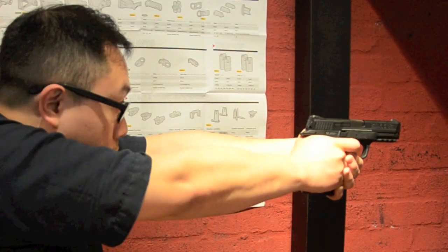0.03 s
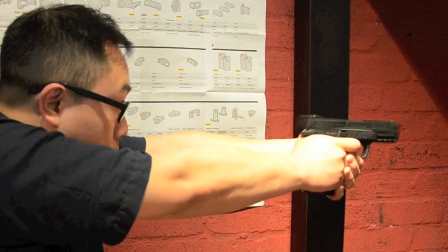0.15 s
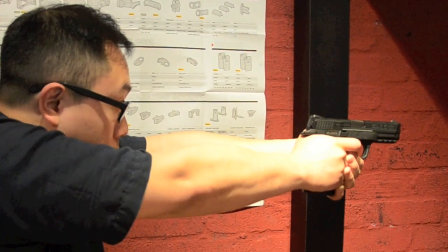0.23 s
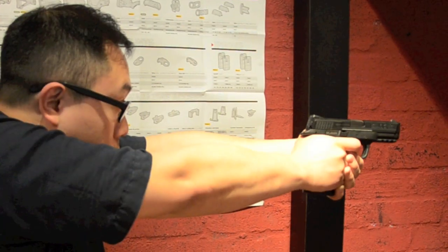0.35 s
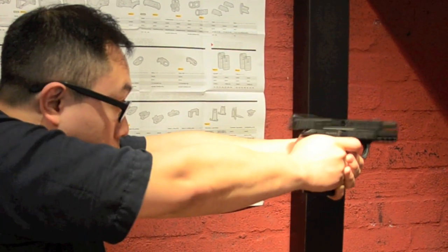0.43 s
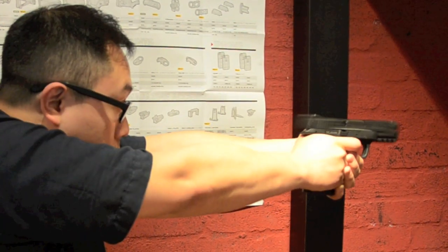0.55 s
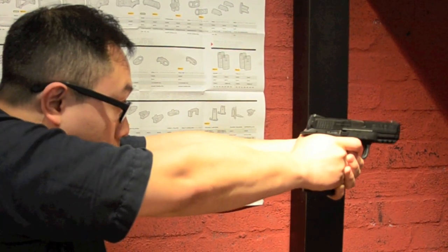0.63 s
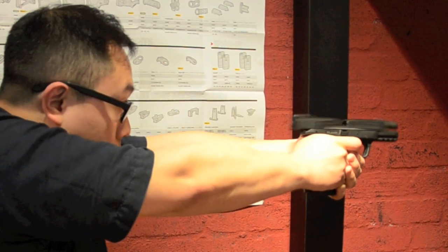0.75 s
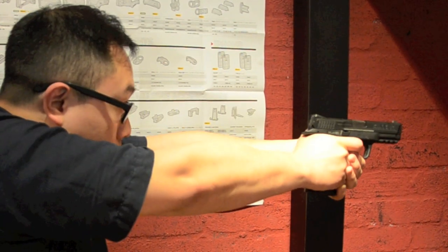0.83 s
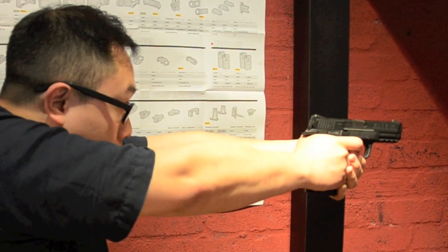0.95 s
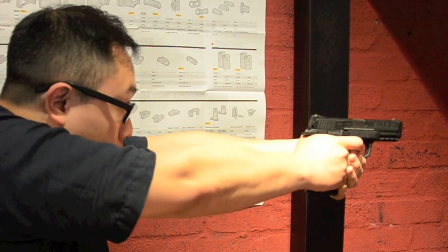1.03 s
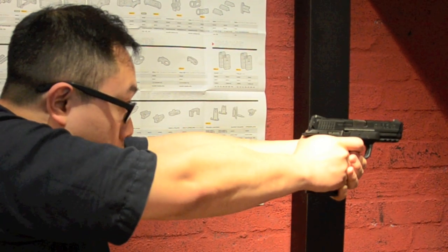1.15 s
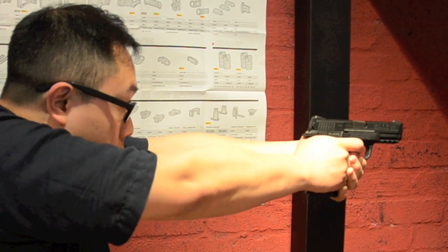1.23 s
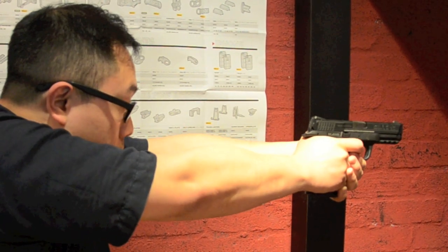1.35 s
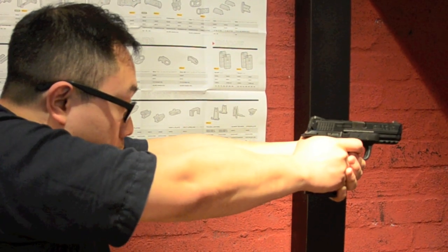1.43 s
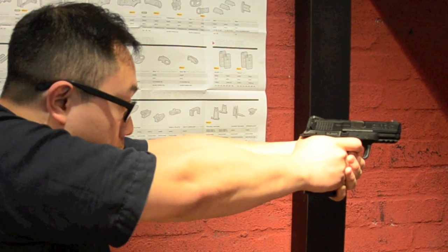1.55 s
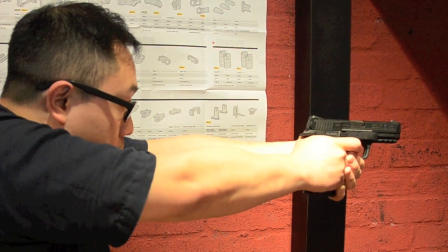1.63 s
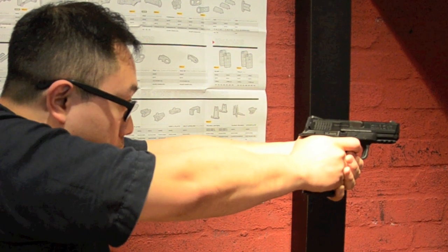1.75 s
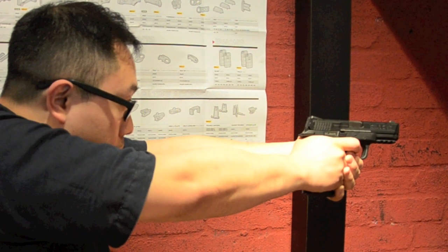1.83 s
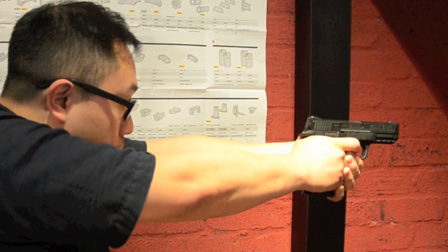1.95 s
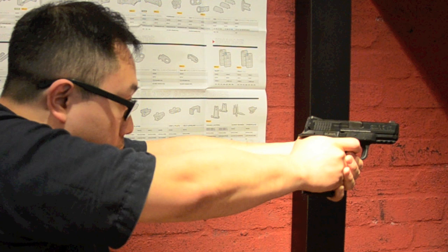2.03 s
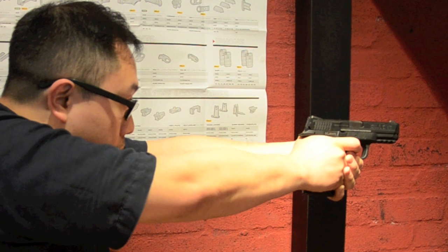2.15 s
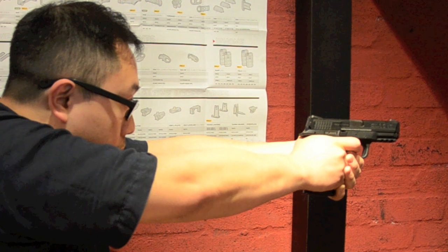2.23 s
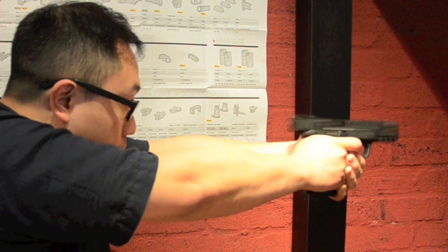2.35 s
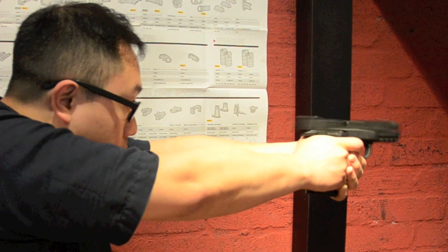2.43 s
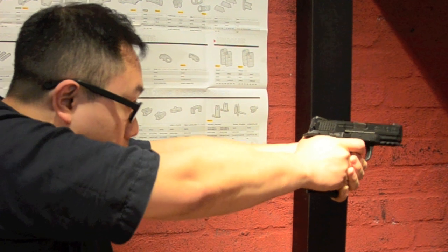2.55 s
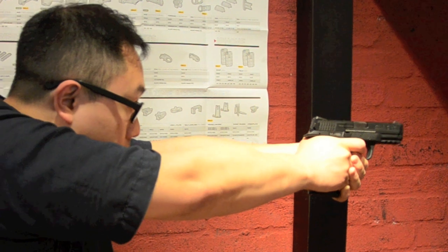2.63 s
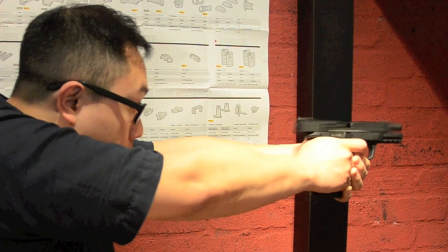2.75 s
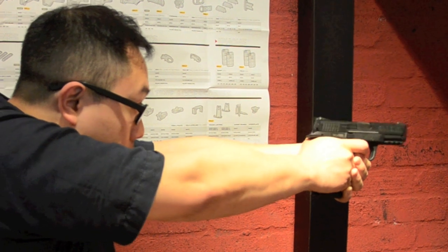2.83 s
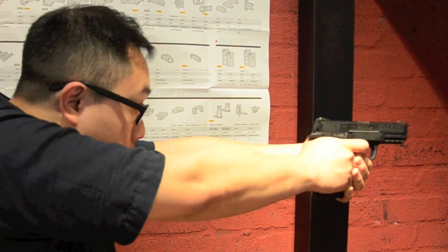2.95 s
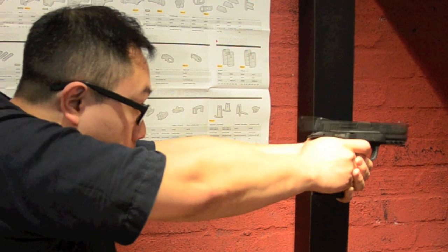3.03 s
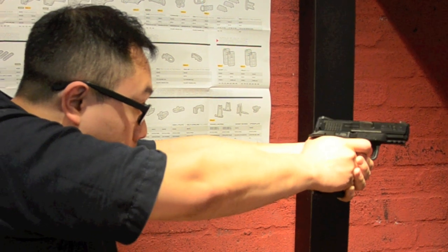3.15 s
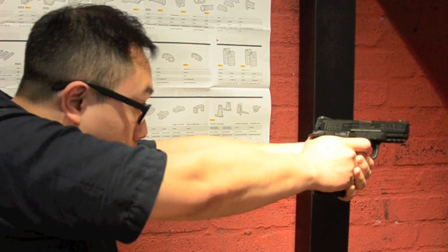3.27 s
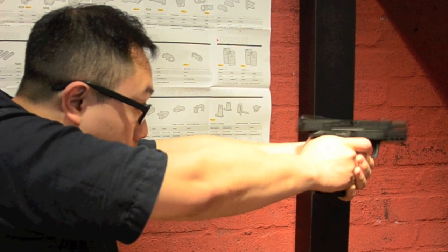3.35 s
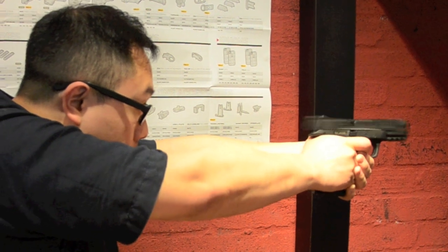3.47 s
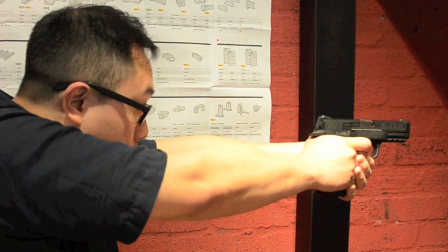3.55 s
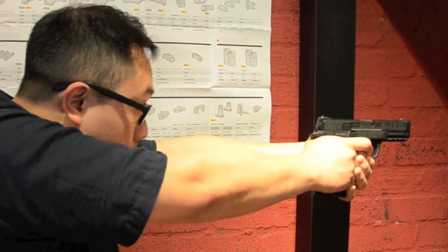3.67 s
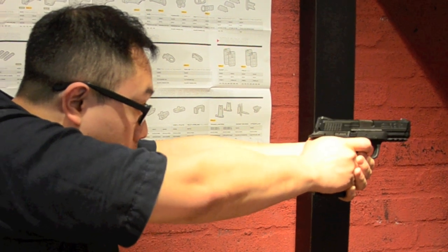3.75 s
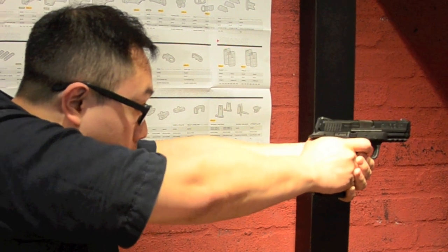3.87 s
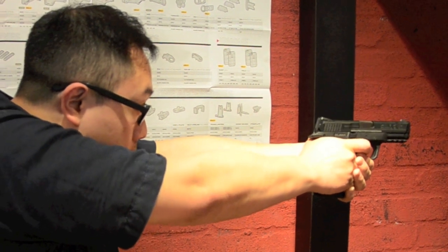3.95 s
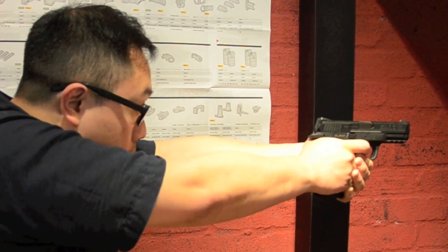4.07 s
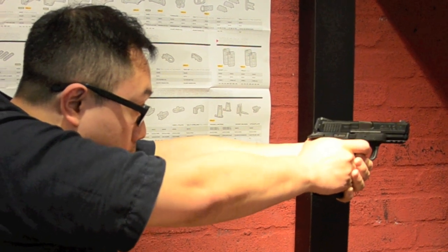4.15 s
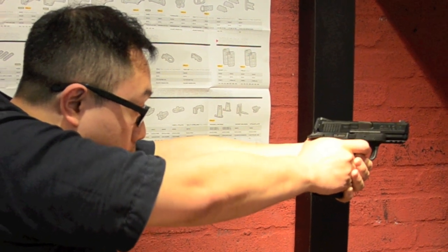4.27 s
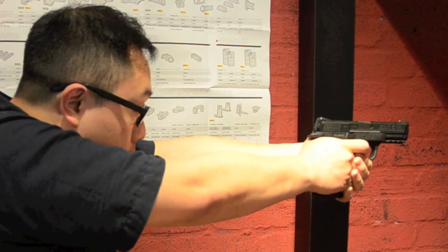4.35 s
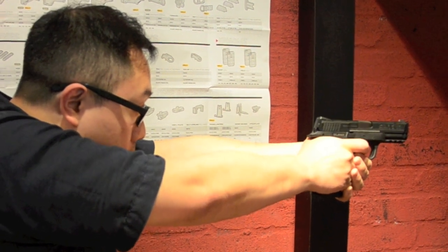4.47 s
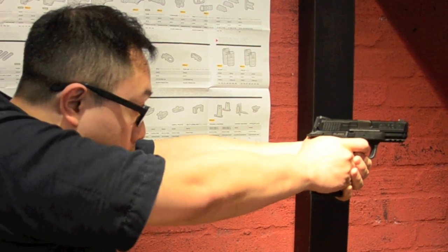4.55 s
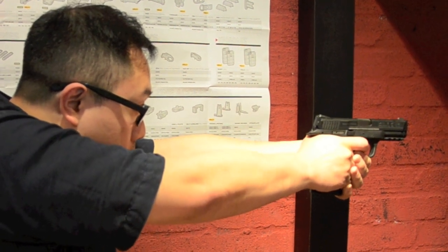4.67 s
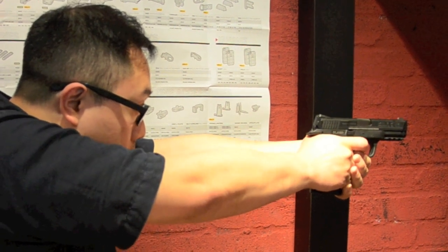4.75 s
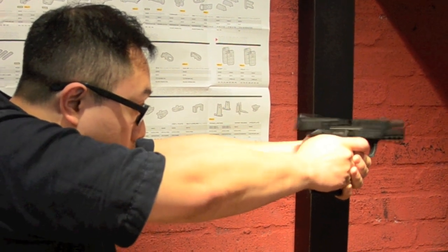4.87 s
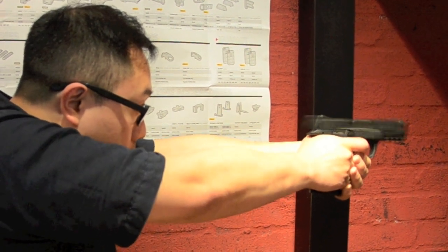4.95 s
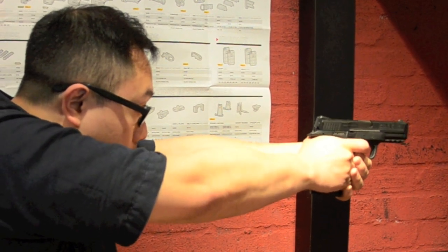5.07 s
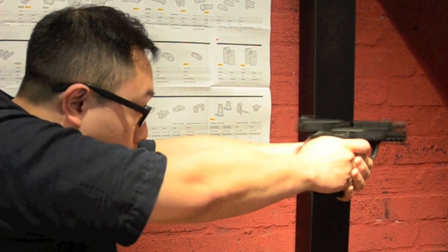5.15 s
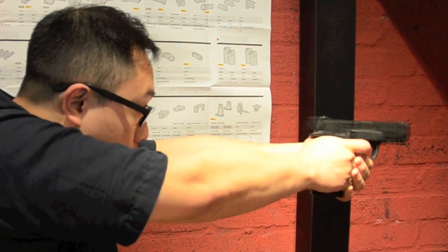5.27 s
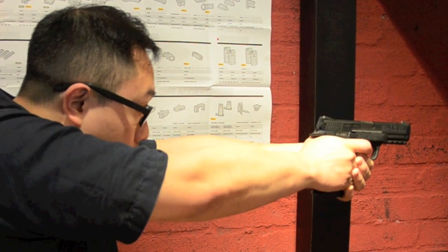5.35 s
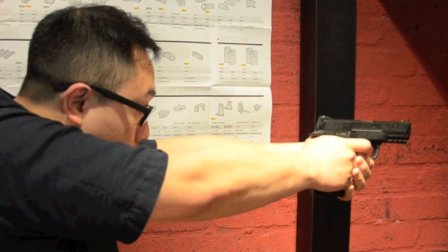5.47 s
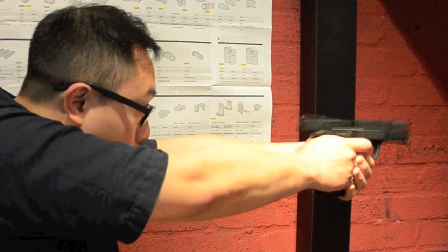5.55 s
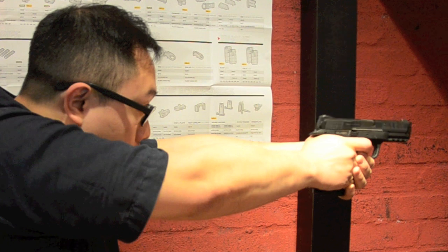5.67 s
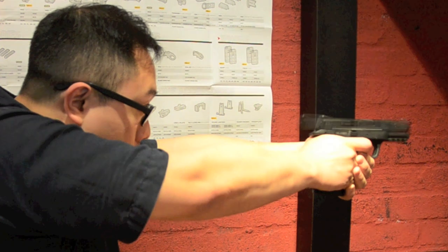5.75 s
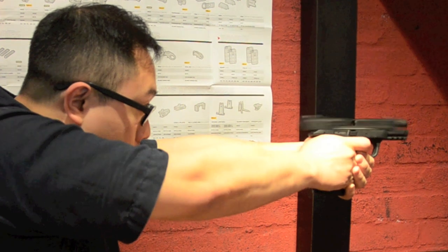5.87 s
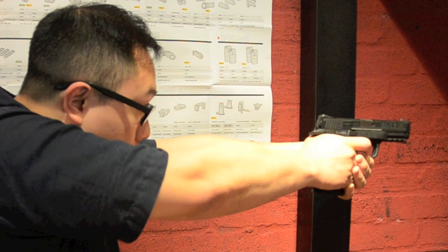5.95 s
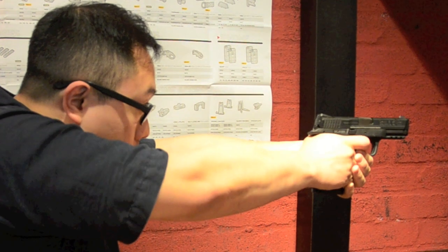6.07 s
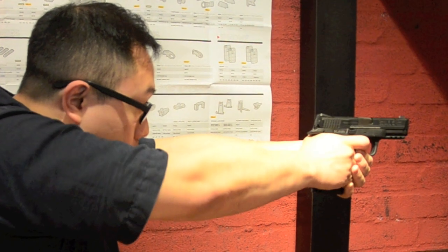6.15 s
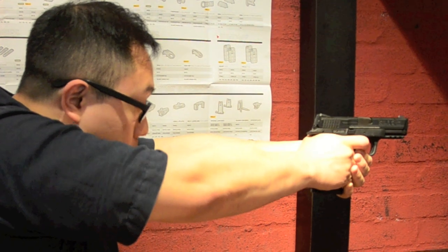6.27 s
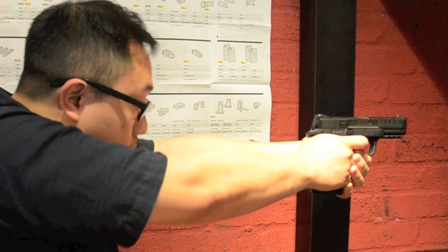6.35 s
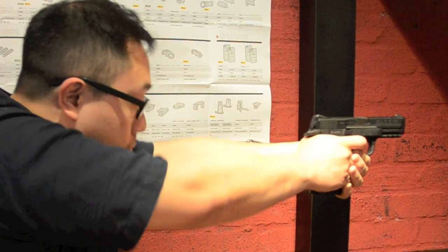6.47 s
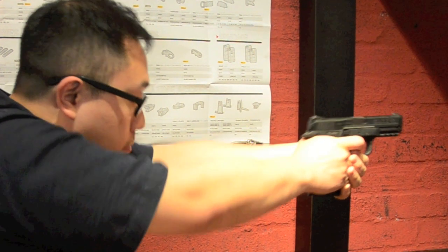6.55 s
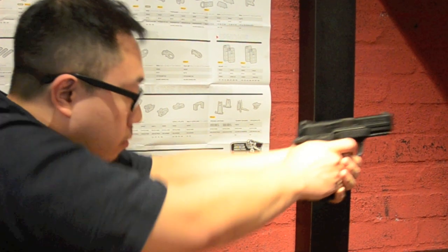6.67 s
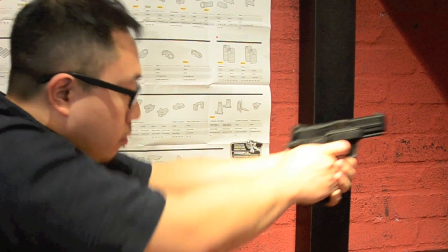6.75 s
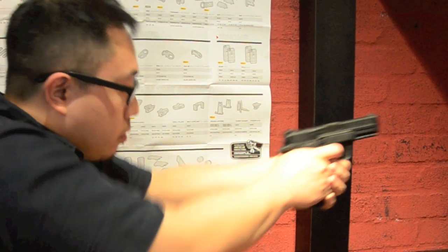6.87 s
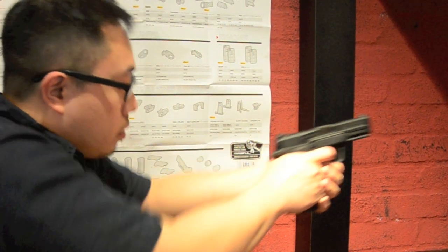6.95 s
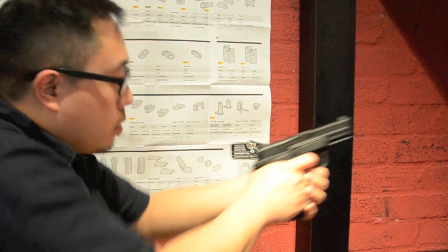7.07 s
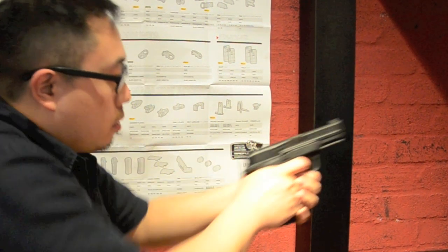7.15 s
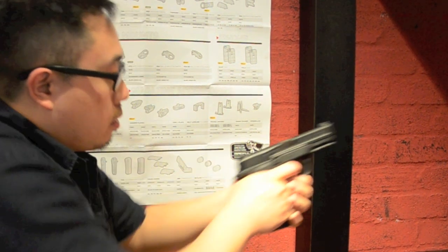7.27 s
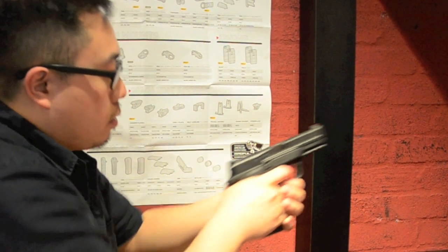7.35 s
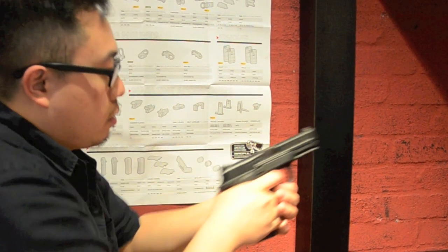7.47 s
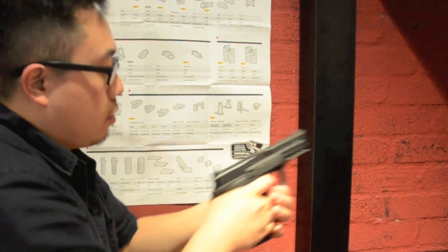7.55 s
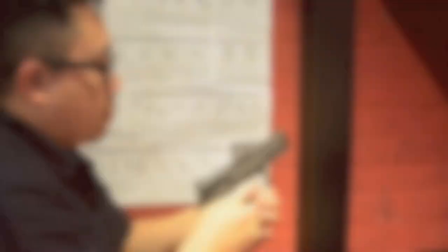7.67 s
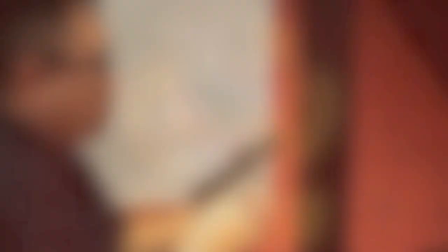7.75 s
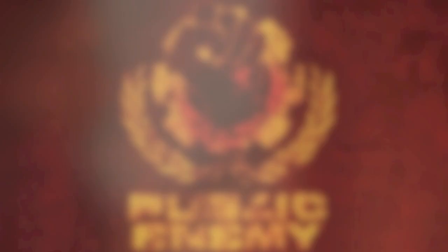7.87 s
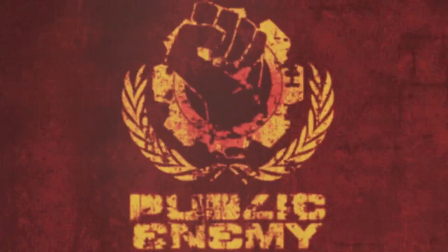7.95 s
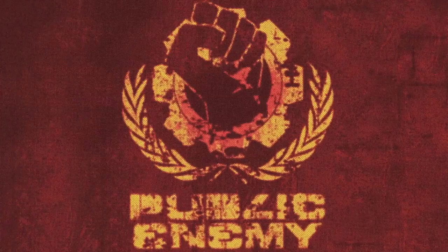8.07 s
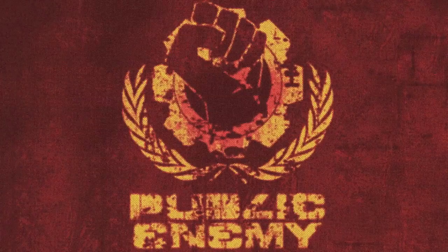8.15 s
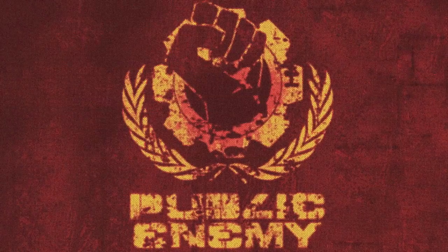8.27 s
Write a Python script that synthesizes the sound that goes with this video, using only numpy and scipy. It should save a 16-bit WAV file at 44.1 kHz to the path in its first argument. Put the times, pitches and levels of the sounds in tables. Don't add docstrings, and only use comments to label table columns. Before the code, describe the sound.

The echo of an earlier shot is already hanging in a hard brick hall as a gas pistol cracks close by at 0.1, 0.4 and 0.7 seconds. Each shot is a very short gas burst with a metallic slide clack, followed about 0.13 seconds later by a pellet smacking the backstop. Echoes last about a second. From 0.9 to 2.2 other lanes answer with blurred pops. Four more shots come between 2.3 and 3.35, then distant reports and smacks around 3.9 to 4.5. The last four shots, 4.8 to 5.8, are hardest; from 5.15 the slide rattles brightly and the magazine gives a low hollow knock. Two distant reports follow near 6.1 and 6.3, then much weaker ones from 6.8, with tiny handling clicks. Ventilation and thin hum lie beneath. The small microphone clips, ducks and recovers; sound fades from 7.6 to silence by 8.1.

```python
import sys
import numpy as np
from scipy import signal
from scipy.fft import rfft, irfft
from scipy.io import wavfile

SR = 44100
rng = np.random.default_rng(int(sys.argv[2]) if len(sys.argv) > 2 else 0)


def gain_from_decibels(decibels):
    exponent = np.asarray(decibels, float) / 20
    return 10 ** exponent


def dump(signal):
    limited = np.clip(np.atleast_2d(signal).T, -1, 1)
    pcm = np.round(limited * 32767).astype(np.int16)
    wavfile.write(sys.argv[1], SR, pcm)


N = 366372
TIME = np.arange(N) / SR
HZ = np.fft.rfftfreq(N, 1 / SR) + 1e-3

# start_s, peak_db, echo_db, recoil_db
SHOTS = [(0.07, -0.5, 5.5, 5.5), (0.411, 2.5, 6.5, 4), (0.706, -1.5, 2.5, -1), (2.337, 1.5, 2.5, -1.5),
         (2.711, 3, 4, 2.5), (3.033, 8.5, 0.5, -7.5), (3.335, -4.5, -1.5, -1.5), (4.826, 3, 8, 5),
         (5.152, 15, 7, 4.5), (5.508, 8, 2.5, -1.5), (5.779, 4.5, -3.5, -15)]
EARLIER_SHOT_S, EARLIER_SHOT_ECHO_DB = -0.32, -0.1
# delay_s, level_db
HAMMER_CLICKS = [
    (-.005, -19),
    (-.0027, -9),
]
# delay_s, level_db, hiss_length_s
GAS_BLAST = [
    (0, -2.5, 0.0021),
    (.0075, -12, 0.0015),
]
# delay_s, level_db, hiss_length_s
SLIDE_RECOIL = [
    (.0042, 4, 0.00098),
    (0.0141, -6.5, 0.0011),
]
# pitch_hz, level_db, t60_s
FRAME_NOTES = [(1040, 1.5, 0.0066), (1540, -14, 0.0037), (3000, 5, 0.006), (5950, -18.5, 0.014),
               (8400, -36, 0.0032)]
LOW_GAS_S = 5.0
# delay_s, level_db
SLIDE_RATTLE = [
    (.011, 4.5),
    (.017, 4),
    (.022, 6.5),
    (.038, 4),
]
# delay_s, level_db
MAGAZINE_KNOCKS = [
    (.011, 2.5),
    (.091, -1.8),
]
# pitch_hz, level_db, t60_s
MAGAZINE_NOTES = [(259, -13, 1.3), (266, -14, 1.2), (286, 1.5, 0.17), (322, -3, 0.12)]
# start_s, level_db
HANDLING_CLICKS = [
    (4.764, -34),
    (7.703, -37),
    (7.944, -37),
]
# pitch_hz, level_db_per_hz
SHOT_ECHO_COLOUR = [(24, -30.5), (60, -12), (170, -11), (400, -8), (800, -6.5), (1400, -5), (2200, -7),
                    (3200, -6.5), (5300, -15.5), (6500, -28), (8000, -30), (9500, -41), (10600, -54.5),
                    (12000, -62.5), (22000, -120)]
# pitch_hz, t60_s
HALL_T60 = [(60, 1.52), (250, 1.18), (1000, 1.214), (2000, 1.26), (4000, 1.15), (6000, 1.03), (8000, 0.64),
            (11000, 0.66)]
# start_s, peak_db, brightness_db_per_octave, tick_db
PELLETS = [(0.2102, -0.5, -5.5, 1.5), (0.54, -1.5, -3, 5), (0.837, -10.5, -8, 3.5),
           (2.4744, -1.5, -4, -6.5), (2.8456, -1, -4.5, 4), (3.1692, -9.5, -3.5, -5), (3.471, -15, -6.5, 0),
           (4.9633, 2, -1.5, 5.5), (5.28, -10, 4, 15.5), (5.641, -6, 1, -2), (5.909, -10, -1, 9.5)]
# start_s, peak_db, brightness_db_per_octave, tail_length_factor, ringing_db
MIDDLE_LANES = [(0.9477, -8, -10.5, 0.93, 0.1), (1.246, -2, -4, 0.41, -10), (1.68, -26, -1, 0.94, -0.5),
                (1.812, -10, 0.7, 0.45, 1.5), (1.9694, -33, 1.5, 0.53, 0.1),
                (2.0453, -23.5, 0.3, 0.85, -10.5), (2.232, -18, 0.9, 0.64, 2.5),
                (3.902, -6.5, -1, 0.55, -1), (4.032, -8, -0.3, 0.43, -4), (4.114, -3, 0.3, 0.61, 2.5),
                (4.1794, -21.5, 8.5, 0.47, 5.5), (4.456, -25, 1, 0.82, -3.5),
                (4.6894, -42, -2.3, 0.92, -2.1), (4.7651, -34.5, 1, 1, -3), (6.059, -2, -8, 0.65, 0.1),
                (6.294, -3.5, -1.2, 0.48, 1.5)]
# start_s, peak_db, brightness_db_per_octave, tail_length_factor, ringing_db
END_LANE = [
    (6.772, -27, 1.5, 0.81, -9),
    (6.8894, -31, -3, 0.81, -2),
    (7.0658, -33, 1.2, 0.69, -7),
    (7.3128, -40, -5.5, 0.98, 2.1),
    (7.37, -27.5, -0.4, 0.65, 2.5),
    (7.5994, -39.5, 3, 0.71, -5),
    (7.7008, -41, -6.5, 0.87, 1),
    (7.944, -21, 0, 0.93, -7),
]
# pitch_hz, level_db_per_hz
FAR_ECHO_COLOUR = [(59, -50), (100, -18), (564, -5.5), (1040, 0.5), (1260, -1), (2370, -1.5), (2830, -3),
                   (4630, -0.5), (6470, -13.5), (8860, -33.5), (11000, -67), (14300, -100), (22000, -120)]
# pitch_hz, level_db_per_hz
END_LANE_ECHO_COLOUR = [(88, -43), (150, -7), (306, -24), (376, -18), (432, -15), (944, -1.5), (1200, -7.5),
                        (1960, -2), (2870, -6), (4280, 0), (7450, -32), (8130, -30), (9500, -64),
                        (12400, -90), (20900, -120)]
# pitch_hz, level_db_per_hz
VENTILATION_COLOUR = [(20, -26), (60, 2.5), (120, -4.5), (300, -9), (850, -17), (2000, -25), (5000, -37),
                      (7000, -60.5), (9000, -67.5), (22000, -120)]
# pitch_hz, level_db_rms
STEADY_TONES = [(360.7, -56.5), (7865, -69.5)]
# pitch_hz, width_hz, level_db
HOUSING = [(1722, 680, 5), (2620, 480, 3.5), (3140, 1100, 0), (5220, 300, 2.5), (2856, 121, -17),
           (3470, 89, -10.5), (4180, 170, 1.5), (7670, 430, -9.5), (8990, 1000, 1.5), (10500, 250, -13.5)]


def pistol():
    hammer = contacts([(shot_s + delay, db, .0015) for shot_s, *_ in SHOTS for delay, db in HAMMER_CLICKS])
    blast = [(shot_s + delay, peak_db + db + 16.5, length)
             for shot_s, peak_db, _, _ in SHOTS for delay, db, length in GAS_BLAST]
    slide = [(shot_s + delay, recoil_db + db + 20.5, length)
             for shot_s, _, _, recoil_db in SHOTS for delay, db, length in SLIDE_RECOIL]
    hall = shot_echo()
    rattle = loose_slide()
    crack = high_pass(contacts(blast + slide) + rattle, 380)
    return smooth_twice(hammer, .00005) + crack + handling() + magazine() + hall


def contacts(rows):
    drive, hiss = np.zeros(N), rng.standard_normal(N)
    age = np.arange(900) / SR
    for s, level_db, length in rows:
        i = round(s * SR)
        drive[i:i + 900] += gain_from_decibels(level_db) * np.exp(-age / length) * hiss[i:i + 900]
    body = sum(gain_from_decibels(db - 15) * ring(drive, hz, t60) for hz, db, t60 in FRAME_NOTES)
    puff = one_pole(drive, .00003) - one_pole(drive, 0.0002)
    return body + gain_from_decibels(-22.0) * puff


def shot_echo():
    dulling_per_db, ring_db = -0.07, -1.1
    echoes = [(EARLIER_SHOT_S, EARLIER_SHOT_ECHO_DB)] + [(shot_s, echo_db) for shot_s, _, echo_db, _ in SHOTS]
    tails = [(s, db + 10.5, dulling_per_db * db, 1.02, .004, ring_db) for s, db in echoes]
    hall = echo(tails, SHOT_ECHO_COLOUR, early_db=6.0, early_share=0.043, ring_hz=2625)
    return hall * flutter(0.53, 0.003)


def loose_slide():
    knocks = after_low_gas(SLIDE_RATTLE, jitter_s=.002, follows=0.8)
    rattle = contacts([(s, db, .0008) for s, db in knocks])
    return rattle + gain_from_decibels(8) * high_pass(rattle, 6500)


def magazine():
    knocks = np.zeros(N)
    for s, db in after_low_gas(MAGAZINE_KNOCKS, jitter_s=0, follows=0.75):
        knocks[round(s * SR)] = gain_from_decibels(db)
    soft = one_pole(knocks, 0.002)
    return sum(gain_from_decibels(db + 10.5) * ring(soft, hz, t60) for hz, db, t60 in MAGAZINE_NOTES) * flutter(2.5, .03)


def after_low_gas(pattern, jitter_s, follows):
    late = [shot for shot in SHOTS if shot[0] > LOW_GAS_S]
    slips = jitter_s * rng.uniform(-1.4, 1, (len(late), len(pattern)))
    return [(shot_s + delay + slip, db + follows * echo_db)
            for (shot_s, _, echo_db, _), row in zip(late, slips)
            for (delay, db), slip in zip(pattern, row)]


def handling():
    clicks = contacts([(s, db + 6, .002) for s, db in HANDLING_CLICKS])
    return peak_filter(smooth_twice(clicks, .00004), 3050, 1500, -9)


def backstop():
    tick = contacts([(s, tick_db + 8.5, .0015) for s, *_, tick_db in PELLETS])
    tick = peak_filter(tick, 3050, 900, -3)
    tick = tick + gain_from_decibels(-32) * ring(tick, 3250, .02)
    smacks = [(s, db + 7, tilt, .8, .004, 1.5) for s, db, tilt, _ in PELLETS]
    return tick + echo(smacks, FAR_ECHO_COLOUR, early_db=9.5, early_share=0.048, ring_hz=3400)


def far_lanes():
    middle = echo(far_reports(MIDDLE_LANES), FAR_ECHO_COLOUR, early_db=3.0, early_share=0.16, ring_hz=5300)
    end = echo(far_reports(END_LANE), END_LANE_ECHO_COLOUR, early_db=1.5, early_share=0.18, ring_hz=4430)
    return (middle + end) * flutter(0.62, 0.0046)


def far_reports(lane):
    swell_per_length_s = 0.014
    return [(s - .005, db - 6.0, tilt, length, swell_per_length_s * length, ring_db)
            for s, db, tilt, length, ring_db in lane]


def background():
    hum_hz, hum_db = STEADY_TONES[0]
    ventilation = gain_from_decibels(-45 - 3.5) * irfft(coloured(VENTILATION_COLOUR), N)
    return ventilation + tone(hum_hz, hum_db) * flutter(2.5, .03)


def echo(rows, spectrum, early_db, early_share, ring_hz):
    s, level_db, tilt, length, swell, ring_db = np.transpose(rows)[:, :, None]
    grid = np.arange(0, N / SR + .002, .001)
    age = np.maximum(grid - s, 0)
    rise = (1 - np.exp(-age / np.maximum(swell, 1e-3))) ** 2
    bins, out = coloured(spectrum), np.zeros(N)
    for step in range(-16, 9):
        hz = 2000 * 2 ** (step / 3)
        window = np.cos(np.pi / 2 * np.clip(3 * np.log2(HZ / hz), -1, 1)) ** 2
        fall_db = -60 * age / (at_hz(HALL_T60, hz) * np.maximum(length, .1))
        early = gain_from_decibels(2 * (early_db + fall_db / early_share))
        tail = gain_from_decibels(2 * fall_db) + early
        ring_shape = np.exp(-(np.log2(hz / ring_hz) / .3) ** 2)
        colour_db = tilt * np.log2(max(hz, 500) / 2000) + ring_db * ring_shape
        power = np.sum(gain_from_decibels(2 * (level_db + colour_db)) * rise * tail, axis=0)
        out += np.interp(TIME, grid, np.sqrt(power)) * irfft(bins * window, N)
    return out


def flutter(depth_db, tau_s):
    lumps = smooth_twice(rng.standard_normal(N), tau_s)
    return gain_from_decibels(depth_db * lumps / np.std(lumps))


def coloured(spectrum):
    bins = rfft(rng.standard_normal(N)) * gain_from_decibels(at_hz(spectrum, HZ))
    return bins / np.std(irfft(bins, N))


def at_hz(points, hz):
    table_hz, value = np.transpose(points)
    return np.interp(np.log(hz), np.log(table_hz), value)


def ring(x, hz, t60):
    r, w = gain_from_decibels(-60 / (t60 * SR)), 2 * np.pi * hz / SR
    return signal.lfilter([0, np.sin(w)], [1, -2 * r * np.cos(w), r * r], x + 1e-18)


def tone(hz, db):
    return gain_from_decibels(db) * np.sqrt(2) * np.sin(2 * np.pi * hz * TIME)


def one_pole(x, tau_s):
    r = np.exp(-1 / (tau_s * SR))
    return signal.lfilter([1 - r], [1, -r], x)


def smooth_twice(x, tau_s):
    return one_pole(one_pole(x, tau_s), tau_s)


def high_pass(x, hz):
    return signal.sosfilt(signal.butter(2, hz, "high", fs=SR, output="sos"), x)


def low_pass(x, hz, order):
    return signal.sosfilt(signal.butter(order, hz, fs=SR, output="sos"), x)


def peak_filter(x, hz, width_hz, db):
    w, a = 2 * np.pi * hz / SR, gain_from_decibels(db / 2)
    k = np.sin(w) * width_hz / hz / 2
    return signal.lfilter([1 + k * a, -2 * np.cos(w), 1 - k * a], [1 + k / a, -2 * np.cos(w), 1 - k / a], x)


def scene():
    return (pistol() + backstop() + far_lanes() + background())[None]


def gain_control(x, limit_db, release_db_s, attack_s):
    over_db = np.maximum(10 * np.log10(one_pole(x ** 2, 0.01) + 1e-12) - limit_db, 0)
    over_db[0] = 12
    climb_db = release_db_s * TIME
    duck_db = np.maximum.accumulate(over_db + climb_db) - climb_db
    return x * gain_from_decibels(-(one_pole(duck_db - duck_db[0], attack_s) + duck_db[0]))


def soft_limit(x, ceiling, hardness):
    return x / (1 + np.abs(x / ceiling) ** hardness) ** (1 / hardness)


def band_limit(x):
    return signal.sosfilt(signal.butter(12, 12120, fs=SR, output="sos"), x)


def record(dry):
    x = high_pass(dry[0], 90)
    for hz, width_hz, db in HOUSING:
        x = peak_filter(x, hz, width_hz, db)
    x = gain_control(x, limit_db=-8.5, release_db_s=18.5, attack_s=0.00079)
    x = soft_limit(x, .81, 24)
    x = high_pass(x, 45)
    x = signal.sosfilt(signal.bessel(4, 9000, fs=SR, output="sos", norm="mag"), x)
    x = np.clip(x, -.77, .77)
    x = low_pass(x, 11200, order=14)
    x = soft_limit(x, .88, 16)
    x = .95 * low_pass(x, 11500, order=10)
    x = x + gain_from_decibels(-74.5) * one_pole(rng.standard_normal(N), .006) * 20
    whine_hz, whine_db = STEADY_TONES[1]
    x = x + tone(whine_hz, whine_db)
    fade_start_s, fade_end_s = 7.57, 8.072
    x = x * np.clip((fade_end_s - TIME) / (fade_end_s - fade_start_s), 0, 1)
    return band_limit(x[None])


dry = scene()
out = record(dry)
dump(out)
```